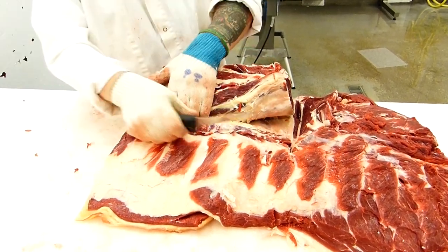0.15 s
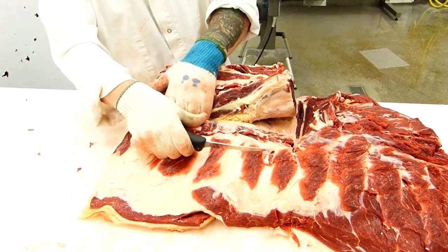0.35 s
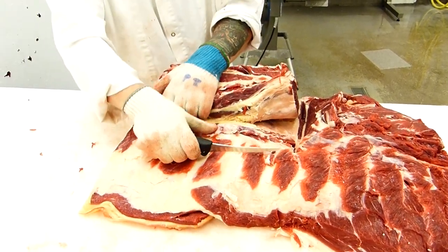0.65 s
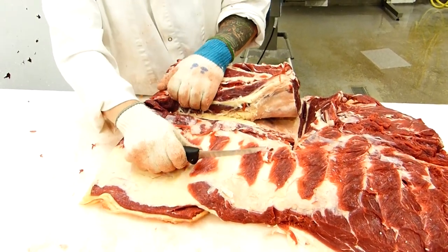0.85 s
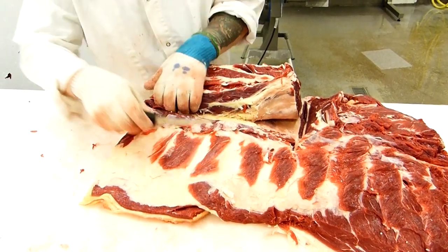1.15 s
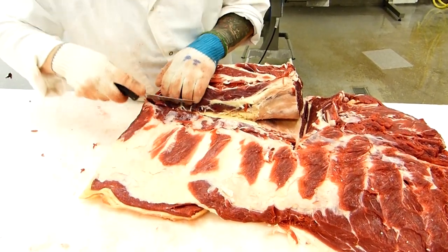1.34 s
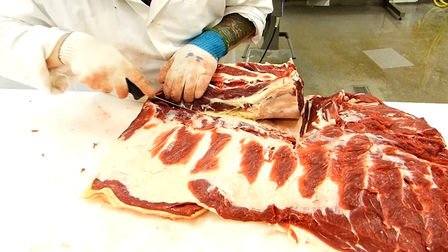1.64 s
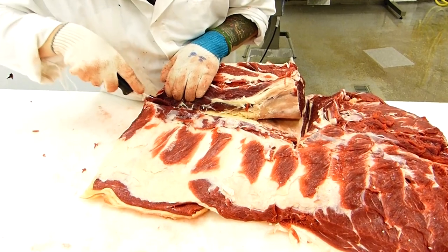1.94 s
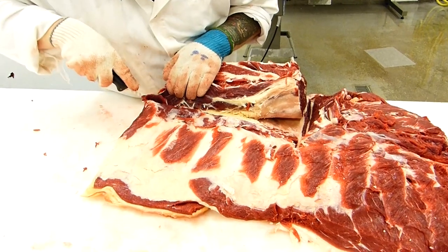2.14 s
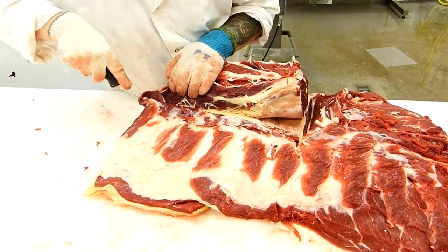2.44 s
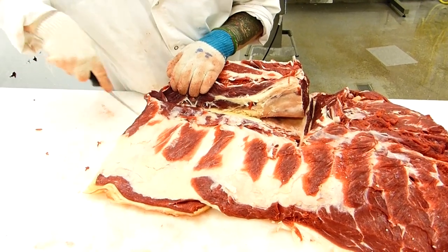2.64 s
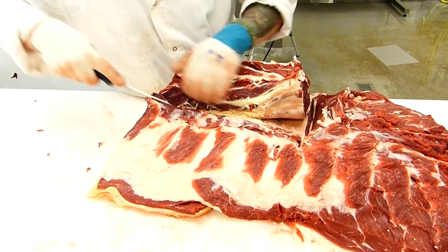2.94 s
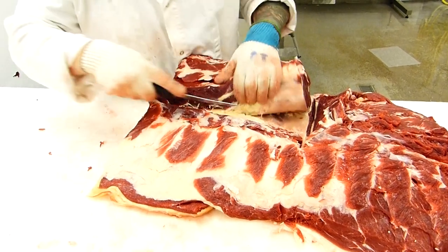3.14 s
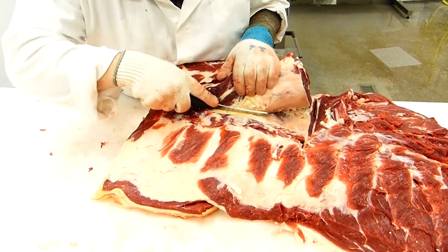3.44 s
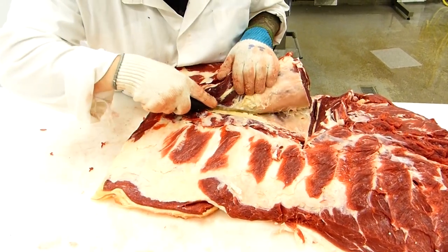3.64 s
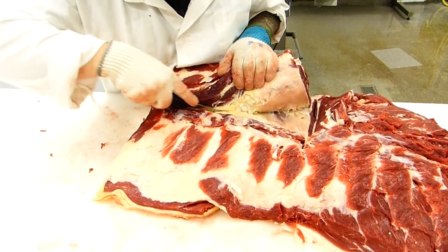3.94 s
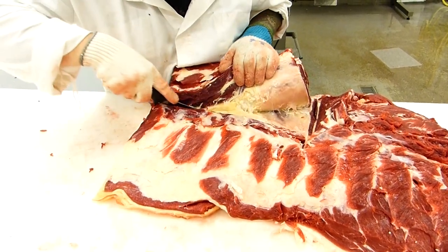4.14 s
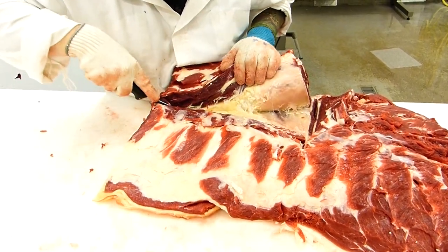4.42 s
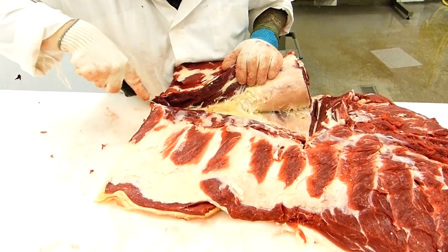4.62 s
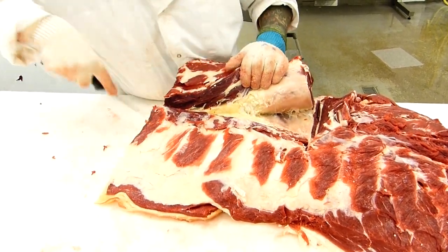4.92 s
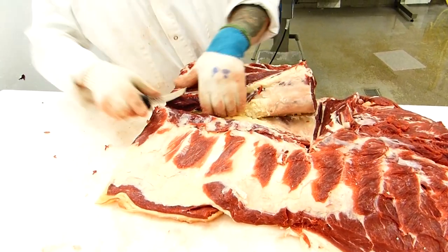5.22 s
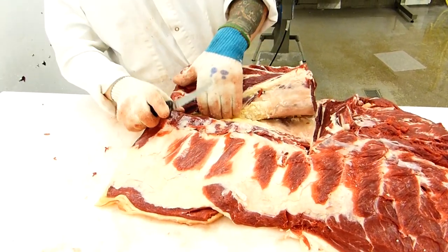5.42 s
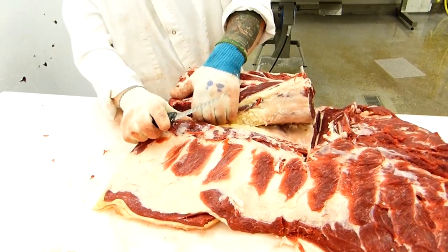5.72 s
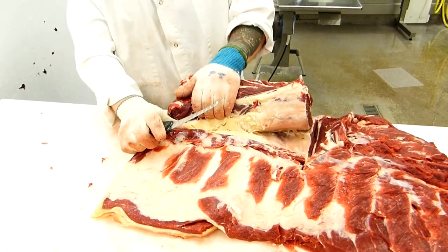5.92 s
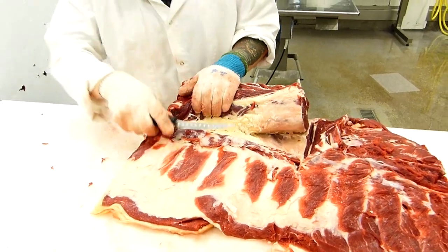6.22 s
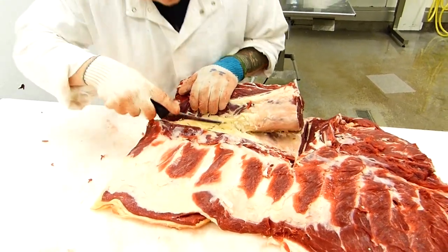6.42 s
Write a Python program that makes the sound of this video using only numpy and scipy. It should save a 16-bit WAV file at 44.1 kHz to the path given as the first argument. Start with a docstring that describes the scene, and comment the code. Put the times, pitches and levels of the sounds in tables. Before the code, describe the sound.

A steady machine hum, rushing air and a high hiss surround the microphone in a cold butchery room, a little stronger on the left. Close in front, a blade slices through meat now and then, snapping fibres and clicking against bone, while wet flesh slides and bumps on a table. Later the knife knocks once, sharply; a few soft bumps follow, ending in a deep thud and a short rumble.

```python
"""A butcher's knife cuts beef: fibres snap, the blade ticks on bone and knocks once, hard.
The meat is shifted with squelches and soft thumps; the heaviest sets the table swaying.
All round the refrigerated room, compressors hum and cooler fans rush under a bright hiss.
Peaks duck the overall gain."""
import sys
import numpy as np
from scipy import signal
from scipy.fft import rfft, irfft, next_fast_len
from scipy.io import wavfile

SR = 44100
rng = np.random.default_rng(int(sys.argv[2]) if len(sys.argv) > 2 else 0)


def wav_record(signal):
    """Record a signal, one row per channel, as 16-bit PCM in the file named by sys.argv[1]."""
    frames = np.transpose(np.atleast_2d(signal))
    bounded = np.clip(frames, -1, 1)
    # unit amplitude maps onto the largest positive 16-bit level
    quanta = np.round(bounded * 32767).astype(np.int16)
    wavfile.write(sys.argv[1], SR, quanta)


N = 289737
N_FFT = next_fast_len(N, real=True)
TIME_S = np.arange(N) / SR
FREQS_HZ = np.maximum(np.fft.rfftfreq(N_FFT, 1 / SR), 1)
CUTOFF_HZ = 15800

# room balance: f/Hz, left minus right/dB
ROOM_LEAN = [(60, 0.5), (110, 2.6), (200, 4.5), (380, 9), (700, 10), (1290, 9.0), (2380, 8), (4400, 6),
             (8120, 4.5), (15000, 3.1)]
# room coherence: f/Hz, left-right correlation
ROOM_CORRELATION = [(30, 0.55), (110, 0.82), (250, 0.4), (700, 0.48), (6500, 0.49), (7600, 0.4),
                    (9000, -0.39), (12000, -.48), (13000, -.63), (16000, -0.48)]
# motor and mains tones: f/Hz, level/dB, waver depth
MOTOR_TONES = [(91.84, -29, 0.15), (100, -40, 0.12), (109, -41, 0.27), (113.3, -39, 0.55),
               (121.2, -40.5, 0.18), (137.1, -42.5, 0.19), (178.1, -47, 0.33), (182.2, -39.5, 0.2),
               (198.7, -38.5, 0.11), (399.2, -46, 0.39), (458, -50, 0.39), (542, -55.5, .4),
               (765, -57.5, 0.16), (15622, -59, .2)]
# air through the coolers: f/Hz, density/dB
FAN_SPECTRUM = [(140, -34), (230, -6.5), (270, -3.5), (400, -3.5), (480, -10), (650, -6.5), (930, -5.5),
                (1060, -4), (1220, -9.5), (1400, -6.5), (1700, -14.5), (2200, -15), (2500, -13),
                (3300, -18.5), (4200, -20), (5400, -21)]
# duct rumble: f/Hz, density/dB
DUCT_SPECTRUM = [(5, -20), (11, -12), (16, -4.5), (20, -2.5), (25, 4.5), (30, -8), (45, -10), (59, -5.5),
                 (66, -7), (73, -9), (82, -10.5), (100, -13.5), (128, -11.5), (190, -15), (215, -20),
                 (300, -28.5), (450, -35)]
# broad hiss: f/Hz, density/dB
HISS_SPECTRUM = [(1900, -18), (2500, -11), (3800, -15), (4390, -8), (5010, -7.5), (5510, -2), (6100, -5),
                 (6670, 1), (7260, -1), (8030, -3), (9060, -0.5), (10000, -9.5), (10700, -13),
                 (11900, -17.5), (12900, -18.5), (15900, -26)]
# resonances in the hiss: f/Hz, half-width/Hz, level/dB re hiss
HISS_WHISTLES = [(2402, 35, -26.5), (5300, 15, -38), (6430, 35, -16), (6914, 20, -16.5), (7370, 67, -11.5),
                 (9100, 29, -15.5), (9200, 50, -18.5)]
# swell and ebb of the hiss: t/s, level/dB
HISS_ENVELOPE = [(0.2, -29.5), (0.8, -25.5), (1.5, -25.2), (1.66, -28), (2.15, -25.5), (3.0, -26),
                 (3.4, -26.5), (4.7, -28.5), (5.4, -25.5), (5.75, -26.5), (6.15, -28.5), (6.5, -25.5)]
# meat pushed over the table: t/s, level/dB, swell/s
MEAT_SHOVES = [(0.36, -23, 0.038), (1.36, -25.5, 0.033), (5.05, -20.5, 0.1), (6.3, -25, 0.11)]
# table-top rumble: f/Hz, density/dB
TABLE_SPECTRUM = [(40, -8.5), (60, -1), (100, -5), (150, -21)]
# meat sliding under the hand: t/s, level/dB, swell/s
MEAT_SQUELCHES = [(0.785, -25, 0.014), (2.68, -28.5, 0.0073), (3.12, -32, 0.025), (5.165, -32, 0.014),
                  (5.715, -32, 0.014), (6.25, -30, 0.024)]
# wet flesh: f/Hz, density/dB
FLESH_SPECTRUM = [(120, 6.5), (220, 1), (450, -4.5), (800, -9.5), (1600, -13), (4000, -33)]
# knife strokes: start/s, end/s, level/dB at full force
KNIFE_STROKES = [(0.62, 0.878, -36), (2.1, 2.7, -46), (3.08, 3.268, -32), (3.23, 3.47, -44),
                 (3.791, 3.87, -24.5), (4.881, 4.908, -22), (5.54, 5.757, -42), (6.22, 6.4, -43)]
# snapping fibres: f/Hz, density/dB
FIBRE_SPECTRUM = [(500, -1), (1300, -9), (2200, -2), (3500, 3), (6000, 4.5), (9000, -9.5), (15000, -19)]
# blade on bone and gristle: t/s, level/dB, f/Hz, t60/cycles
BLADE_TICKS = [(0.68, -9, 2200, 3.7), (0.731, -10, 3000, 3.3), (3.132, -8, 3500, 5), (3.1608, -6, 3800, 4),
               (3.1868, 1, 5100, 7.3), (3.2342, 0, 9000, 2), (3.401, -3, 7000, 3), (3.831, 0, 5060, 3),
               (3.8562, -6, 2250, 14), (3.8574, -3.5, 3300, 21), (4.8983, -2.5, 3480, 2.8),
               (5.649, -8.5, 3000, 4)]
# meat and hands on the table: t/s, level/dB, f/Hz
MEAT_THUMPS = [(0.7933, -14, 170), (2.690, -22, 400), (5.198, -15, 219), (5.216, -10, 66),
               (5.356, -12, 101.5), (5.609, -13.5, 77), (5.756, -20.5, 420), (5.762, 0, 56.6)]
# modes rung by the knock: f/Hz, level/dB, t60/s
KNOCK_MODES = [(171, -17, 0.048), (354, -9, 0.011), (500, 0, 0.016), (636, -2.5, 0.02), (895, -7.5, 0.036),
               (1810, -15, .02), (2830, -3, 0.011), (5030, -19, 0.0036)]
# crack of the knock: f/Hz, density/dB
CRACK_SPECTRUM = [(700, -2), (1000, -2), (1400, 10), (3300, 6.5), (6000, -9), (10000, -21), (15000, -31)]
# room tail of the knock: f/Hz, density/dB
TAIL_SPECTRUM = [(150, -5), (350, 1.5), (500, -10), (595, 3.5), (690, -4.5), (950, -5), (1400, -22),
                 (1650, -10), (1830, -6), (2100, -14.5), (5000, -31), (12000, -45)]
# table on its legs: f/Hz, level/dB, t60/s
TABLE_MODES = [(23.6, -3.5, 1.84), (22, -28, 2.6), (56.5, -13.5, 1.54)]


def from_db(db):
    """Decibels to gain."""
    return 10 ** (np.asarray(db) / 20)


def unit_rms(x):
    """Scale to rms 1."""
    return x / np.sqrt(np.mean(x ** 2) + 1e-20)


def over_hz(points):
    """Interpolate (f/Hz, value) rows over log frequency."""
    hz, value = np.transpose(points)
    return np.interp(np.log(FREQS_HZ), np.log(hz), value)


def colour(points):
    """Spectral gain, falling 12 dB/octave beyond the end points."""
    edge = np.minimum(FREQS_HZ / points[0][0], points[-1][0] / FREQS_HZ)
    return from_db(over_hz(points)) * np.minimum(1, edge) ** 2


def pan(lean_db):
    """Left and right gains for a level difference."""
    return from_db(np.array([[.5], [-.5]]) * lean_db)


def drift(corner_hz):
    """Slow random wander, rms 1."""
    grid_s = TIME_S[::100]
    hz = np.fft.rfftfreq(len(grid_s), grid_s[1])
    spectrum = rfft(rng.standard_normal(len(grid_s))) / (1 + (hz / corner_hz) ** 2)
    return np.interp(TIME_S, grid_s, unit_rms(irfft(spectrum, len(grid_s))))


def ripple(width_hz, depth_db):
    """Fine spectral grain from narrow duct and casing resonances."""
    grid_hz = np.linspace(0, SR / 2, 8192)
    pole = np.exp(-np.pi * grid_hz[1] / width_hz)
    grain = signal.filtfilt([1 - pole], [1, -pole], rng.standard_normal(len(grid_hz)), padtype=None)
    return from_db(depth_db * np.interp(FREQS_HZ, grid_hz, np.clip(grain / grain.std(), -3, 3)))


def room_noise(gain):
    """Diffuse coloured stereo noise; the mean of both sides has rms 1."""
    real, imaginary = rng.standard_normal((2, 2, len(FREQS_HZ)))
    mid, side = real + 1j * imaginary
    correlation, lean_db = over_hz(ROOM_CORRELATION), over_hz(ROOM_LEAN)
    pair = np.sqrt(1 + correlation) * mid + np.sqrt(1 - correlation) * side * [[1], [-1]]
    mono_gain = np.sqrt(np.cosh(lean_db * np.log(10) / 20) + correlation)
    noise = irfft(pair * pan(lean_db) * gain / mono_gain, N_FFT)[:, :N]
    return noise / noise.mean(axis=0).std()


def since(start_s):
    """Elapsed seconds, zero before the start."""
    return np.maximum(TIME_S - start_s, 0)


def swell(start_s, swell_s):
    """Soft-contact envelope, peak 1 after two swell times."""
    age = np.minimum(since(start_s) / swell_s, 50)
    return (age / 2) ** 2 * np.exp(2 - age)


def decay(start_s, t60_s):
    """Sharp-blow envelope."""
    return (TIME_S > start_s) * np.exp(-np.log(1000) * np.minimum(since(start_s) / t60_s, 10))


def ring(start_s, hz, t60_s):
    """Struck mode: a damped sine."""
    out = np.zeros(N)
    live = slice(int(start_s * SR) + 1, int((start_s + 2 * t60_s) * SR) + 2)
    age_s = TIME_S[live] - start_s
    out[live] = np.sin(2 * np.pi * hz * age_s) * np.exp(-np.log(1000) * age_s / t60_s)
    return out


def motors(trim_db=0.4, waver_hz=0.61, whine_waver_hz=3.4, right_lead_rad=0.7):
    """Motor tones waver in amplitude and phase, the high ones faster."""
    out = np.zeros((2, N))
    for hz, level_db, depth in MOTOR_TONES:
        rate_hz = waver_hz + whine_waver_hz * np.sqrt(hz / CUTOFF_HZ)
        phase_rad = 2 * np.pi * (hz * TIME_S + rng.random()) + depth * drift(rate_hz)
        tone = (1 + depth * drift(rate_hz)) * np.sin(phase_rad + [[0], [right_lead_rad]])
        lean_db = np.interp(hz, FREQS_HZ, over_hz(ROOM_LEAN))
        out += from_db(level_db + trim_db) * unit_rms(tone) * pan(lean_db)
    return out


def fans(rush_db=-33.5, rumble_db=-28.0, flutter_db=0.25):
    """Air rushes through the coolers and rumbles in the ducts."""
    air = room_noise(colour(FAN_SPECTRUM) * ripple(width_hz=36, depth_db=2.06))
    rush = from_db(rush_db + flutter_db * drift(12)) * air
    return rush + from_db(rumble_db) * room_noise(colour(DUCT_SPECTRUM))


def hiss(trim_db=0.65, flutter_db=0.68):
    """Jet-like hiss with faint whistles, swelling and ebbing."""
    power = unit_rms(colour(HISS_SPECTRUM)) ** 2
    for hz, half_width_hz, db in HISS_WHISTLES:
        resonance = 1 / (1 + ((FREQS_HZ - hz) / half_width_hz) ** 2)
        power += (from_db(db) * unit_rms(resonance)) ** 2
    jet = room_noise(np.sqrt(power) * ripple(width_hz=30, depth_db=1.46))
    level_db = np.interp(TIME_S, *np.transpose(HISS_ENVELOPE))
    return from_db(level_db + trim_db + flutter_db * drift(11)) * jet


def meat_handling():
    """Wet flesh slides; the table top rumbles under the load."""
    wet = sum(from_db(db) * swell(start_s, swell_s) for start_s, db, swell_s in MEAT_SQUELCHES)
    load = sum(from_db(db) * swell(start_s, swell_s) for start_s, db, swell_s in MEAT_SHOVES)
    return wet * room_noise(colour(FLESH_SPECTRUM)) + load * room_noise(colour(TABLE_SPECTRUM))


def fibre_snaps(ref_snaps_per_s=900, ref_db=-37, skew=1.87, lean_db=6.5):
    """Fibres snap at random, harder as the blade force builds, denser in louder strokes."""
    snaps, chance = np.zeros(N), rng.random(N)
    sizes = np.minimum(rng.exponential(1, N), 4) * rng.choice([-1, 1], N)
    for start_s, end_s, level_db in KNIFE_STROKES:
        progress = np.clip((TIME_S - start_s) / (end_s - start_s), 0, 1)
        force = np.sin(np.pi * progress ** skew)   # peaks late
        snaps_per_s = ref_snaps_per_s * from_db(level_db - ref_db)
        snaps += from_db(level_db) * force * unit_rms(sizes * (chance < snaps_per_s / SR))
    pair = snaps * (1 + rng.standard_normal((2, N))) * pan(lean_db)
    return irfft(rfft(pair, N_FFT) * unit_rms(colour(FIBRE_SPECTRUM)), N_FFT)[:, :N]


def blade_ticks(splash_db=-18, splash_t60_s=0.028, lean_db=3.0):
    """Each catch on bone or gristle rings briefly, with a wet splash."""
    out, noise = np.zeros(N), rng.standard_normal(N)
    for start_s, level_db, hz, cycles in BLADE_TICKS:
        splash_band = signal.butter(1, [hz / 2, min(hz * 2, CUTOFF_HZ)], "band", fs=SR, output="sos")
        splash = signal.sosfilt(splash_band, noise * decay(start_s, splash_t60_s) + 1e-18)
        out += from_db(level_db) * (ring(start_s, hz, cycles / hz) + from_db(splash_db) * splash)
    tick_band = signal.butter(1, [1200, 13000], "band", fs=SR, output="sos")
    return signal.sosfilt(tick_band, out) * pan(lean_db)


def meat_thumps(swell_cycles=0.49, lean_db=0.5, left_lead_s=0.0024):
    """Soft contacts last a few cycles; the slow table wave reaches the left first."""
    left = np.zeros(N)
    for start_s, db, hz in MEAT_THUMPS:
        left += from_db(db) * swell(start_s, swell_cycles / hz) * np.sin(2 * np.pi * hz * since(start_s))
    table_wave = signal.sosfiltfilt(signal.butter(2, 120, fs=SR, output="sos"), left)
    right = left - table_wave + np.interp(TIME_S - left_lead_s, TIME_S, table_wave)
    return np.array([left, right]) * pan(lean_db)


def knock(start_s=4.9153, direct_db=-1.5, lean_db=4.0, crack_db=-9, crack_t60_s=0.048,
          tail_db=-19.0, room_t60_s=0.88, flutter_db=0.9):
    """A hard, dead knock at the table with a short crack; bare walls answer unevenly."""
    body = sum(from_db(db) * ring(start_s, hz, t60_s) for hz, db, t60_s in KNOCK_MODES)
    crack = from_db(crack_db) * decay(start_s, crack_t60_s) * room_noise(colour(CRACK_SPECTRUM))
    tail_envelope = from_db(tail_db + flutter_db * drift(30)) * decay(start_s, room_t60_s)
    tail = tail_envelope * room_noise(colour(TAIL_SPECTRUM))
    return from_db(direct_db) * (body * pan(lean_db) + crack) + tail


def table_sway(start_s=5.827):
    """After the heaviest thump the loaded table rocks and its top shudders."""
    return sum(from_db(db) * ring(start_s, hz, t60_s) for hz, db, t60_s in TABLE_MODES)


def scene():
    """Machines all round, table work just ahead."""
    machines = motors() + fans() + hiss()
    knife = fibre_snaps() + blade_ticks() + knock()
    meat = meat_thumps() + meat_handling() + table_sway()
    return machines + knife + meat


def gain_cut(peak_db, threshold_db, max_db, release_db_per_s):
    """Cut in dB: the excess over threshold, capped, released at a steady rate."""
    excess_db = np.clip(peak_db - threshold_db, 0, max_db)
    ramp_db = release_db_per_s * TIME_S
    return np.maximum.accumulate(excess_db + ramp_db) - ramp_db


def record(dry, attack_s=0.0023):
    """Slow gain control and fast limiter, then clipping and a steep low-pass."""
    peak_db = 20 * np.log10(np.abs(dry).max(axis=0) + 1e-9)
    slow_db = gain_cut(peak_db, threshold_db=-5, max_db=2.5, release_db_per_s=2)
    fast_db = gain_cut(peak_db, threshold_db=0, max_db=7, release_db_per_s=43)
    pole = np.exp(-1 / (attack_s * SR))
    cut_db = signal.lfilter([1 - pole], [1, -pole], np.maximum(slow_db, fast_db))
    limited = np.clip(dry * from_db(-cut_db), -1, 1)
    return signal.sosfilt(signal.ellip(10, .1, 80, CUTOFF_HZ, fs=SR, output="sos"), limited)


dry = scene()
out = record(dry)
wav_record(out)
```